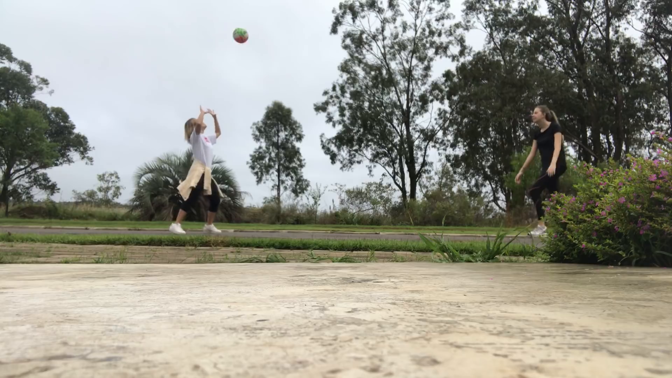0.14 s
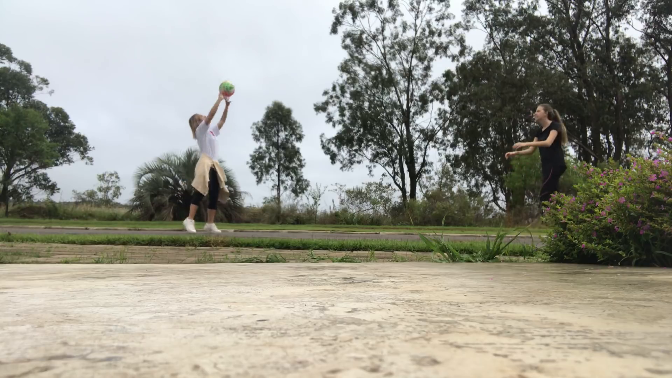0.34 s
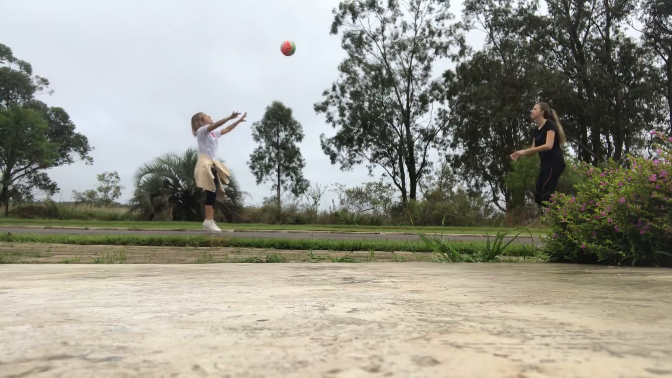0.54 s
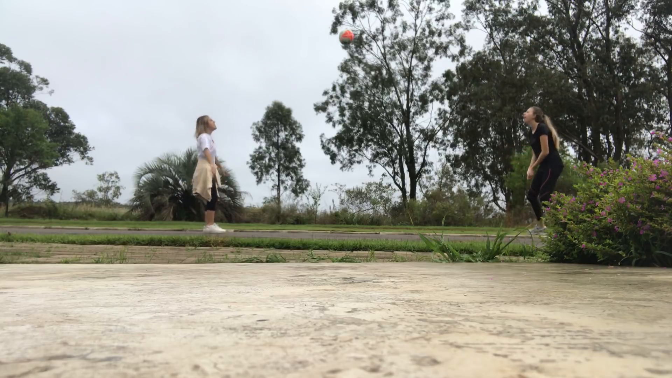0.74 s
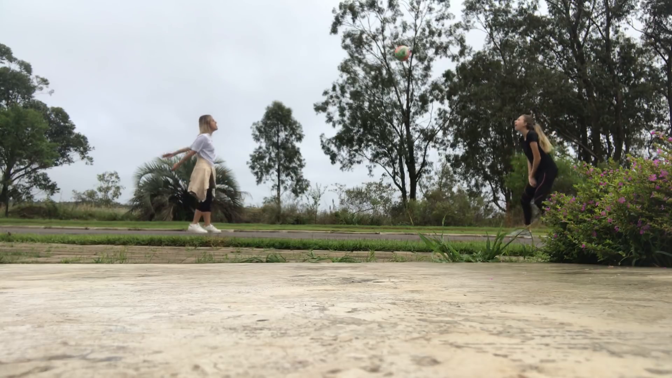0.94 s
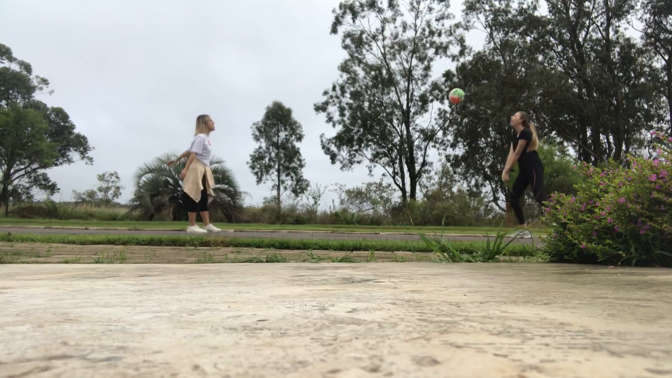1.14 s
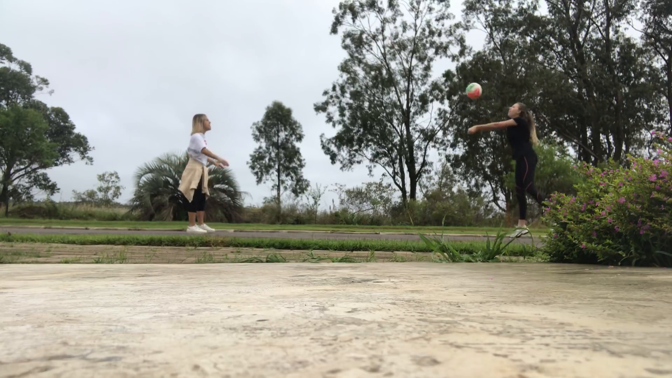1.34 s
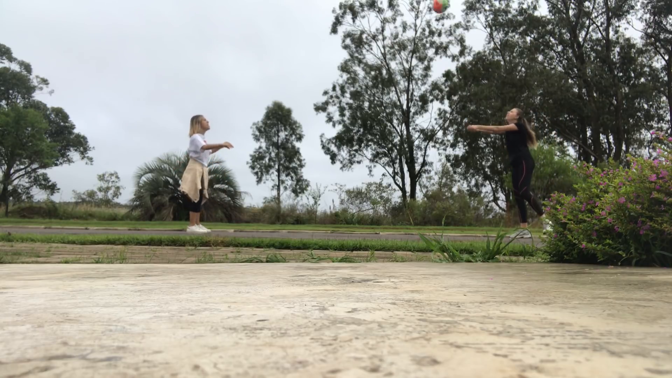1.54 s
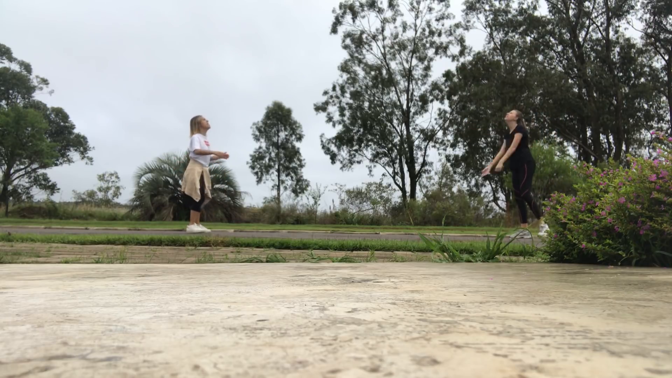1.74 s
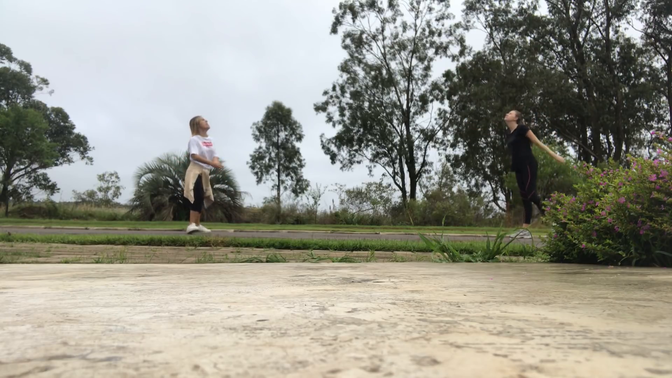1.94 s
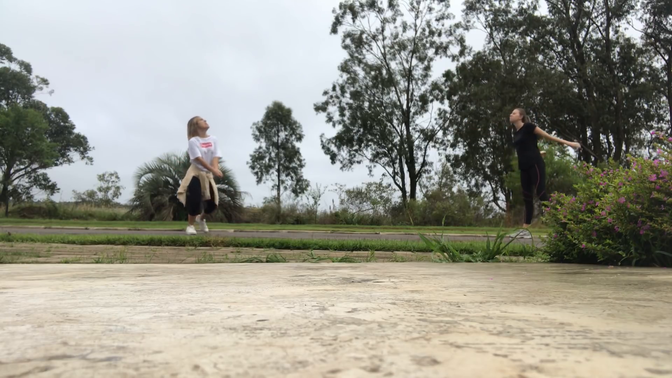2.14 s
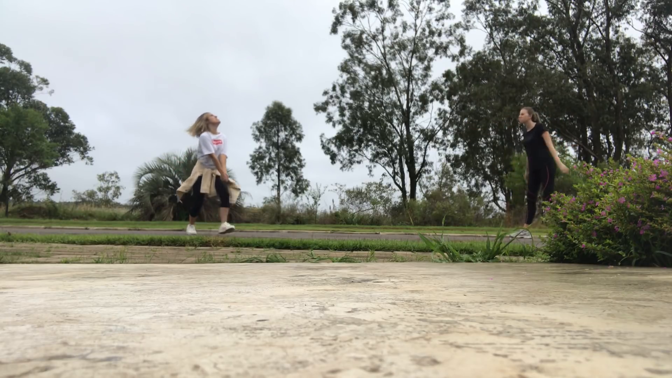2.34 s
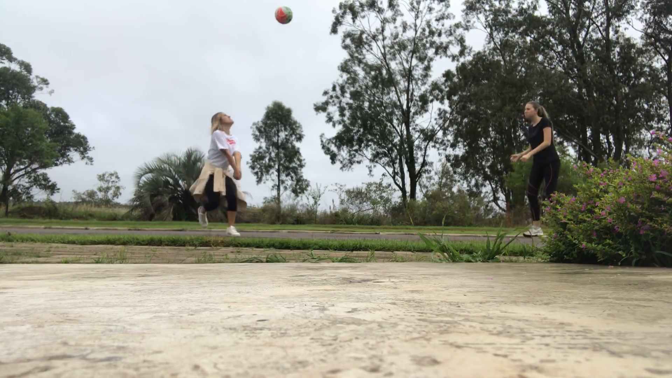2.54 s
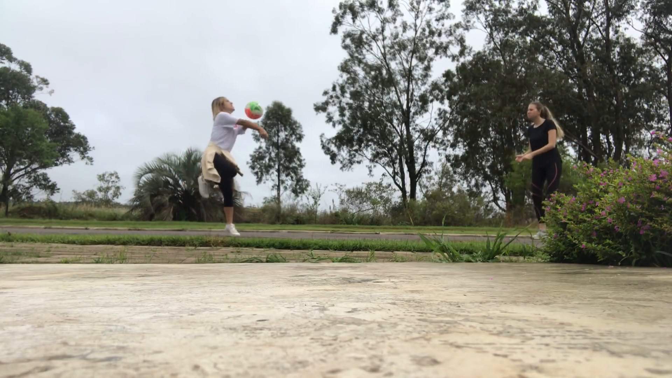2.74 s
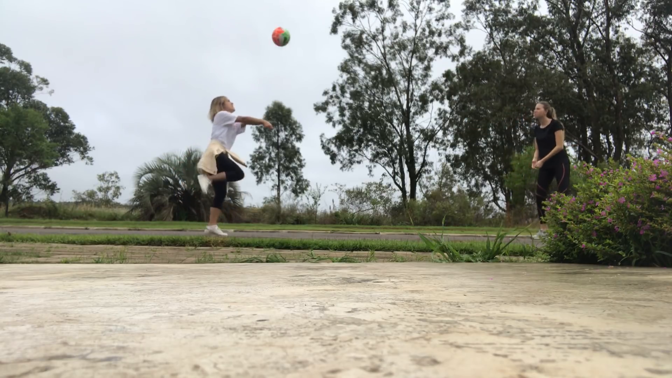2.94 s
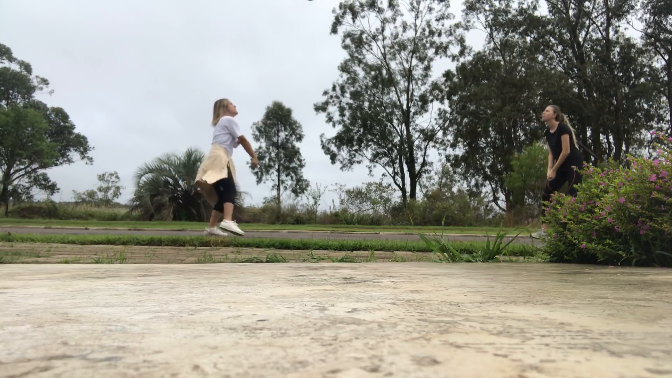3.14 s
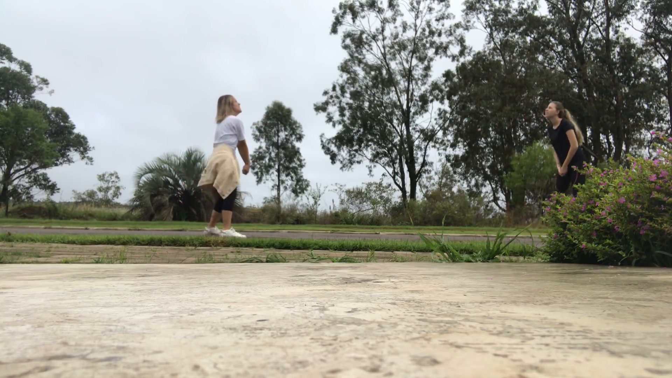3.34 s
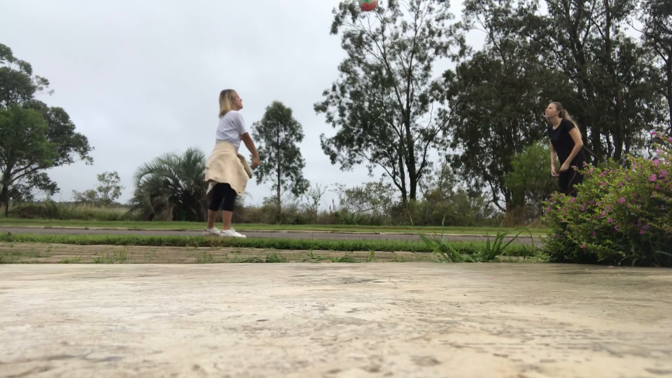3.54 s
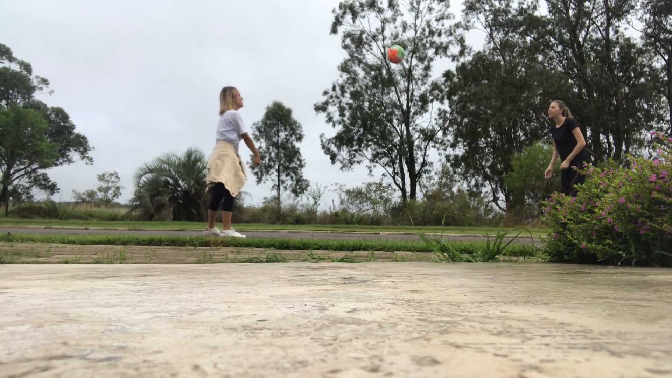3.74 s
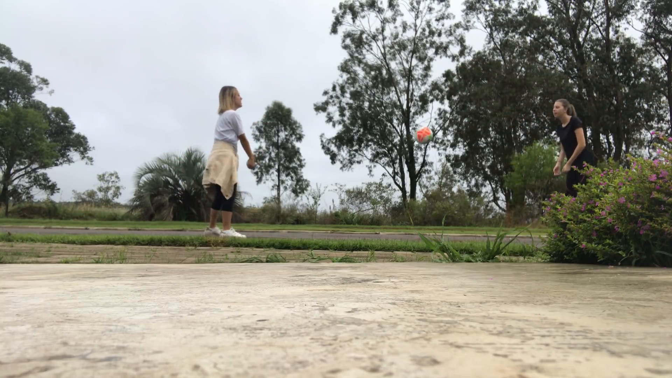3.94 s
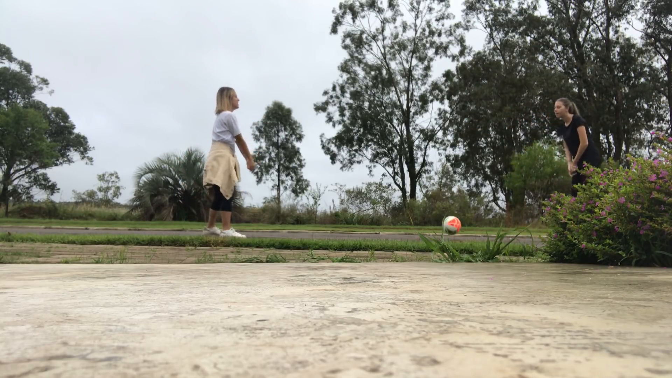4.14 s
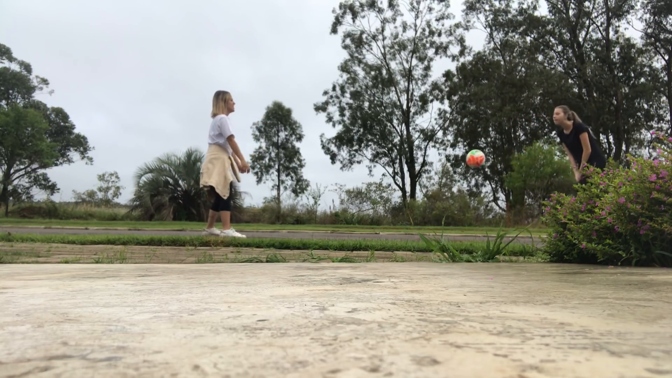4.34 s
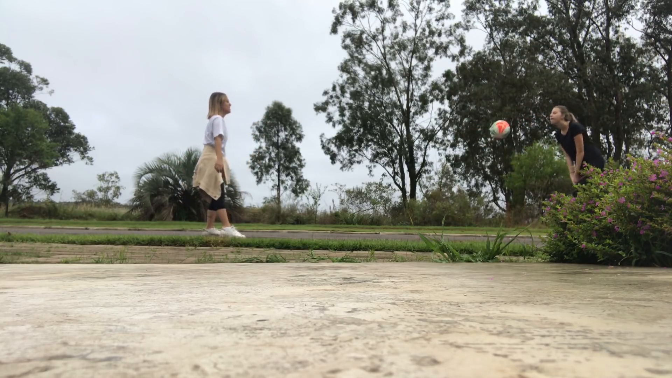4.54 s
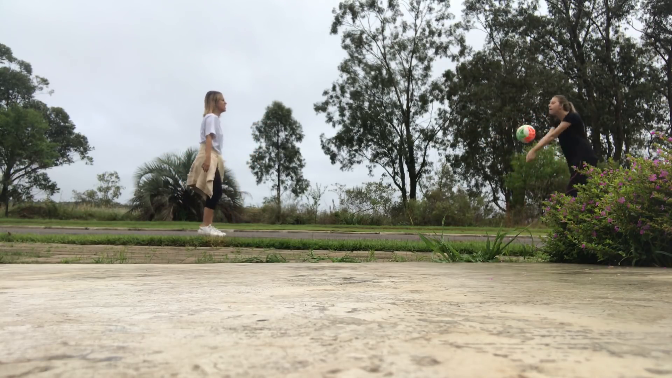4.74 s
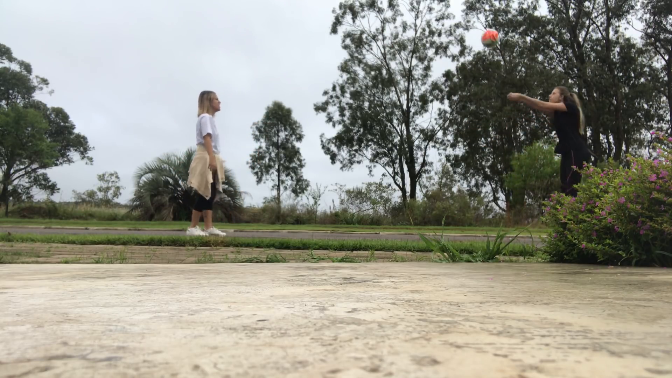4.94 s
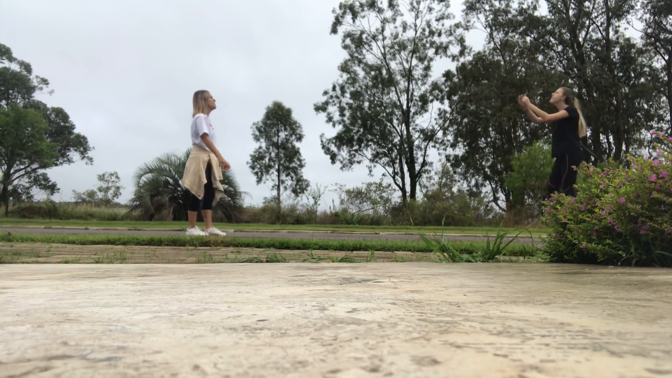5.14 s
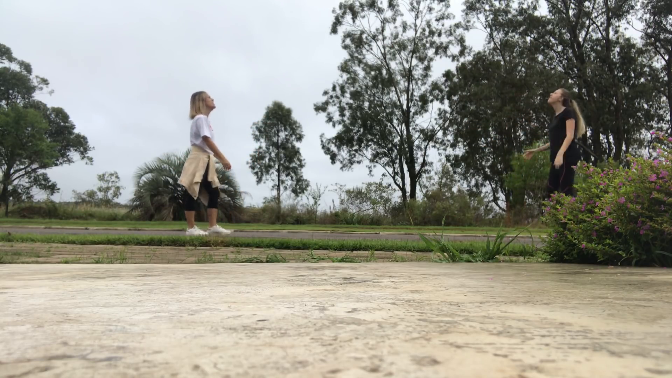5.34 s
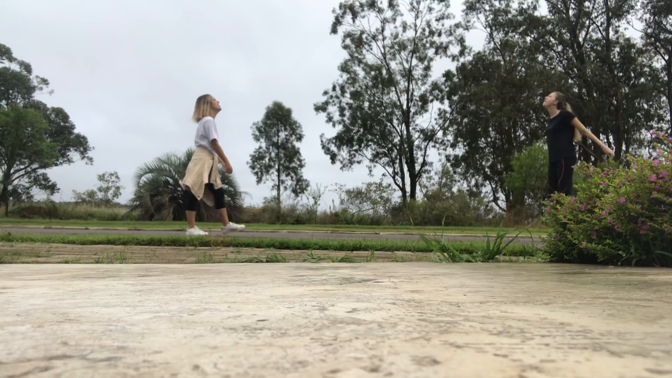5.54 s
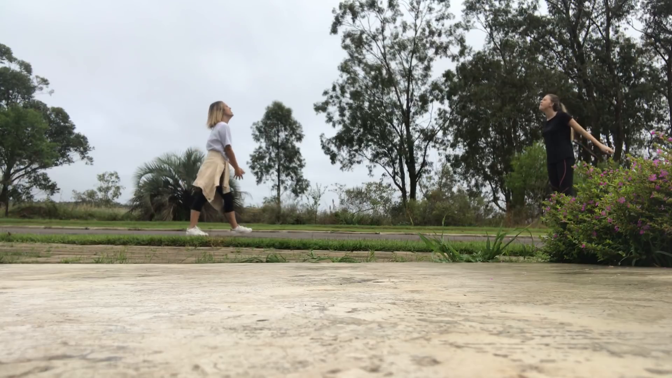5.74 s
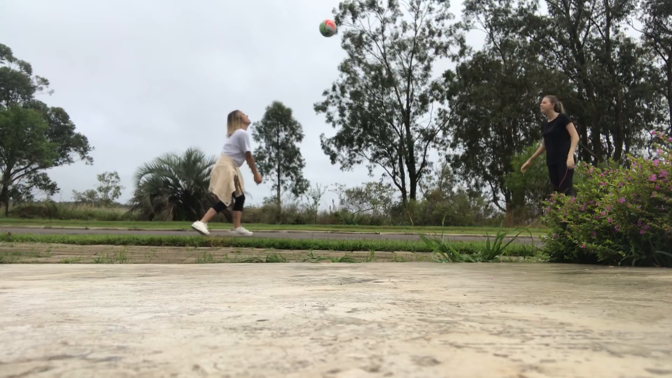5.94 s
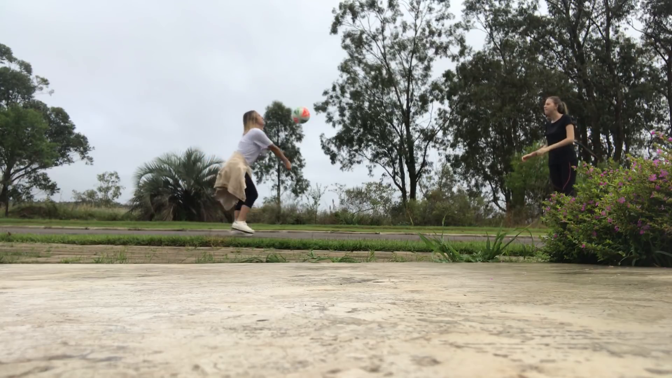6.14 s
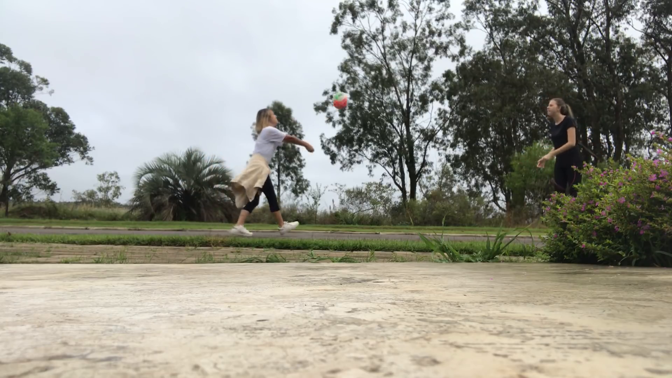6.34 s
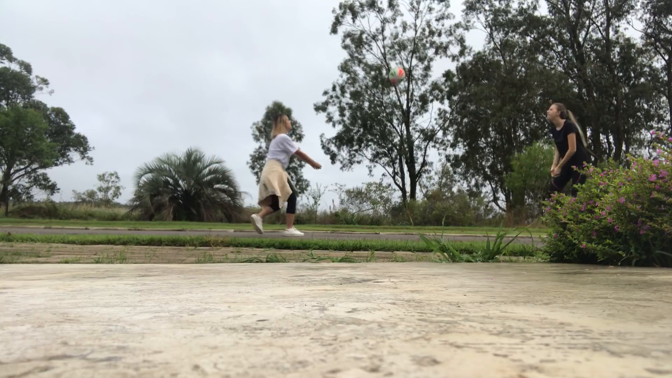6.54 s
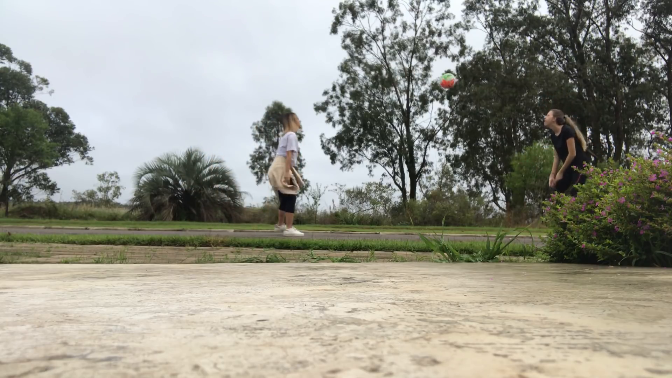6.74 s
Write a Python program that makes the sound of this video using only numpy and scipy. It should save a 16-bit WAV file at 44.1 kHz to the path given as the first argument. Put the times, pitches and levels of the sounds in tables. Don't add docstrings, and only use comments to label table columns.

```python
import sys
import numpy as np
from scipy import signal
from scipy.io import wavfile
from scipy.ndimage import uniform_filter1d

SR = 44100
rng = np.random.default_rng(int(sys.argv[2]) if len(sys.argv) > 2 else 0)


def voltage_ratio(level):
    return 10 ** (np.asarray(level, float) / 20)


def dump_mix(stems):
    frames = np.atleast_2d(stems).T
    limited = np.clip(frames, -1, 1)
    pcm = np.round(limited * 32767).astype(np.int16)
    wavfile.write(sys.argv[1], SR, pcm)


N = 304290

# (frequency [Hz], level [dB per Hz])
RUMBLE = [(18, -59), (30, -0.5), (47, 0), (65, -4), (139, -14), (266, -18), (464, -27), (624, -29),
          (824, -35.5), (973, -34), (2500, -52), (3250, -59), (5500, -120)]
# (frequency [Hz], level [dB per Hz])
HISS = [(700, 6), (1500, 3), (2500, -0.5), (4000, 0.5), (5000, -4.5), (6200, -1), (7600, -4.5),
        (8200, -7.5), (10000, -8), (10500, -14.5), (11200, -8), (14000, -9), (15800, -8.5), (16000, -45)]
# (hold [s], lift [dB], fade [1/s])
LIFTS = [(.2, 16, 11.4), (.41, 16, 0.99), (.22, 13.5, 1.7), (.3, 15.5, 3.2), (.3, 19, 13),
         (0.412, 15, 0.74)]
# (frequency [Hz], share of the lift [0-1])
LIFT_SHARE = [(100, 0.21), (500, 0.12), (2000, 0.65), (16000, 0.72)]
# (frequency [Hz], decay to -60 dB [s])
YARD = [(80, 0.3), (250, 0.35), (1000, 0.14), (4000, 0.16), (12000, 0.15)]

# (start [s], length [s], first pitch [Hz], last pitch [Hz], peak level [dB])
SLIDES = [(3.29, 0.22, 7770, 5080, -63.5), (4.575, 0.18, 7700, 5300, -73)]
CHIRPS = [(.12, 0.14, 7100, 5600, -82), (1.05, 0.045, 4700, 4760, -78), (3.37, 0.025, 6540, 4300, -68),
          (3.37, .06, 7300, 6640, -75), (3.43, .07, 6200, 6930, -75), (3.49, 0.034, 6950, 6750, -76),
          (3.65, .08, 10100, 7900, -80), (4.77, 0.08, 4600, 3900, -77), (6.06, 0.11, 6670, 5160, -74),
          (6.8, 0.069, 6700, 6100, -75), (6.81, .05, 7550, 7000, -79), (6.855, 0.13, 7200, 4610, -65.5)]
# (share of length [0-1], share of fall [0-1], level [dB])
SLIDE_SHAPE = [(0, 0, -14), (.24, .11, -9), (.38, .44, 0), (.6, .66, -4), (.8, .84, -4), (1, 1, -13)]
CHIRP_SHAPE = [(0, 0, -5), (.2, .26, 0), (.6, .66, -2), (1, 1, -6)]

# (time [s], sole level [dB], sole pitch [Hz], grit level [dB])
HEELS = [(0.089, -58, 770, -65.5), (1.004, -60, 930, -63.5), (2.204, -49, 784, -60.5),
         (2.485, -53, 1300, -51.5), (2.534, -43, 660, -77), (2.694, -48, 1300, -54.5),
         (3.059, -52.5, 1070, -66), (3.152, -49.5, 940, -89), (3.255, -51, 684, -57.5),
         (3.675, -57, 720, -71), (3.882, -61, 507, -87), (6.781, -51.5, 611, -64)]
TOES = [(0.827, -53, 660, -82), (1.032, -62, 606, -65), (2.214, -49.5, 675, -75), (2.553, -67, 641, -59.5),
        (2.712, -64, 651, -62), (2.738, -57.5, 1050, -66), (4.088, -58, 514, -61.5), (6.461, -45, 612, -51),
        (6.516, -42, 685, -59), (6.814, -60, 572, -62.5)]
SCUFFS = [(0.104, -56, 920, -62.5), (1.233, -63, 550, -59), (2.505, -49, 674, -58),
          (3.208, -64, 570, -62.5), (3.39, -53, 1120, -52.5), (3.416, -59, 880, -54),
          (3.633, -59, 575, -64.5), (4.108, -57, 940, -63), (4.822, -54, 1690, -60),
          (6.235, -61, 503, -62.5)]
# (rise [s], length [s], thud re sole [dB])
GAITS = [
    (.0003, .008, 8),
    (.0003, .007, -6),
    (.01, .028, -2),
]
# (frequency [Hz], level [dB per Hz])
GRIT = [(1200, -24.5), (2500, 9.5), (4000, 7), (7000, -3), (12000, -14), (15800, -21), (16300, -50)]

# (time [s], side [0 left, 1 right], slap [dB], slap brightness [dB per octave], thump [dB])
BUMPS = [
    (0.3903, 0, -29.5, -1.5, -20),
    (1.3607, 1, -12, -0.5, -15.5),
    (2.8499, 0, -14.5, 1.5, -11.5),
    (4.2148, 1, -9, -0.5, -13),
    (4.8596, 1, -18.5, 0.5, -17),
    (6.295, 0, -8, -1.4, -12.5),
]
# (delay [s], level re slap [dB], top [Hz], clap re slap [dB])
TOUCHES = [
    [(.0042, 8.5, 16200, -6), (.0155, -3, 14000, -3)],
    [(0.0144, -6, 5430, -15)],
    [(0.014, -3, 2470, -11.5)],
    [(.0075, -19, 13900, -10), (.0105, -32, 4000, -12.5)],
    [(0.0123, -4.5, 6500, -18.5)],
    [(0.0127, -25, 7000, -13)],
]
# (frequency [Hz], level [dB per Hz])
SLAP = [(350, -28), (520, -14.5), (700, 1), (1200, -3), (1700, -8), (2500, -8.5), (3500, -6.5),
        (4800, -16.5), (5900, -11), (7900, -22.5), (10300, -23), (13000, -18), (16500, -35.5), (17200, -63)]
# (clap pitch [Hz], clap re slap [dB], wobble pitch [Hz], wobble level [dB], thump pitch [Hz])
CLAPS = [(1136, 7, 317, -28.5, 113), (1587, -9.5, 218, -31, 77), (830, -15, 302, -28, 93),
         (745, -16.5, 320, -22.5, 98), (740, -8.5, 274, -28.5, 84), (1205, -8.5, 235, -33.5, 94)]
# (pitch [Hz], decay to -60 dB [s], twin pitch [Hz], twin re mode [dB], twin decay to -60 dB [s])
CAVITY = [(990, .13, 1050, -4, .1), (1873, .14, 1866, -16, .12), (2490, .16, 2500, -24, .8),
          (3128, .18, 3150, -8, .15), (3258, .25, 3269, -9, .5), (3850, .1, 3990, -2, .1)]
RINGS = [(-54, -44, -44, -49, -50, -53), (-47, -37, -41, -46, -45, -52), (-47, -38, -38, -55, -47, -56),
         (-50, -34, -48, -47, -49, -52), (-62, -39, -39, -70, -68, -62), (-44, -35, -39, -49, -45, -47)]
# (delay [s], level [dB])
WALL = [(.067, -1), (0.141, -12.5), (.213, -18.5)]
# (bass [dB], treble [dB])
WALL_DB = [
    (-30, -26),
    (-14.5, -23),
]


def evened(x):
    return x / np.sqrt(np.mean(x ** 2) + 1e-20)


def read(points, hz):
    f, value = np.transpose(points)
    return np.interp(np.log(hz + 1), np.log(f + 1), value)


def add(mix, s, sound):
    part = mix[round(s * SR):][:len(sound)]
    part += sound[:len(part)]


def colour(x, points):
    hz = abs(np.fft.fftfreq(4096, 1 / SR))
    log_gain = np.log(voltage_ratio(np.maximum(read(points, hz), -100)))
    response = np.exp(log_gain - 1j * signal.hilbert(log_gain).imag)
    taps = np.fft.ifft(response).real[:1024]
    return signal.fftconvolve(x, taps / np.linalg.norm(taps))[:len(x)]


def band(x, lo_hz, hi_hz, order=2):
    return signal.sosfilt(signal.butter(order, [lo_hz, hi_hz], "band", fs=SR, output="sos"), x)


def yard(x):
    taps = np.zeros(SR)
    at = np.arange(1900, SR - 20, 20)
    taps[at + rng.integers(0, 20, len(at))] = rng.choice([-1., 1.], len(at))
    hz, t, z = signal.stft(taps, SR, nperseg=256)
    decay_db = -60 * t / read(YARD, hz)[:, None]
    tail = signal.istft(z * voltage_ratio(decay_db), SR, nperseg=256)[1]
    return signal.fftconvolve(x, tail / np.linalg.norm(tail))[:len(x)]


def air():
    level_db, hiss_db = -51, -42.5
    frames, hz = N // 128 + 9, np.fft.rfftfreq(1024, 1 / SR)
    t = np.arange(frames) * 128 / SR
    real, imag, patches = rng.standard_normal((frames, 513, 3)).T
    patches = evened(uniform_filter1d(uniform_filter1d(patches, 8, 0), 30, 1))
    lift_db = np.zeros(frames)
    for (s, *_), (hold, db, fade) in zip(BUMPS, LIFTS):
        lift_db += db * (t > s) * (t < s + hold) * np.exp(-fade * np.maximum(t - s, 0))
    drift_db = np.where(hz < 500, 1.8, .7)[:, None]
    shape = np.hypot(voltage_ratio(read(RUMBLE, hz)) * (hz < 4000), voltage_ratio(read(HISS, hz) + hiss_db))
    z = (real + 1j * imag) * shape[:, None] * voltage_ratio(drift_db * patches)
    steady = signal.istft(z, nperseg=1024, noverlap=896)[1]
    rumble_rms = np.std(band(steady, 26.7, 440))
    z *= voltage_ratio(level_db + read(LIFT_SHARE, hz)[:, None] * lift_db) / rumble_rms
    return band(signal.istft(z, nperseg=1024, noverlap=896)[1][:N], 46, 17000, order=4)


def birds():
    out = np.zeros(N)
    for rows, shape in ((SLIDES, SLIDE_SHAPE), (CHIRPS, CHIRP_SHAPE)):
        at, fall, swell_db = np.transpose(shape)
        for s, length, first_hz, last_hz, db in rows:
            u = np.arange(0, length, 1 / SR) / length
            waver = evened(uniform_filter1d(rng.standard_normal(N // 8), 200))[:len(u)]
            glide = first_hz + (last_hz - first_hz) * np.interp(u, at, fall)
            pitch = uniform_filter1d(glide, 300) * (1 + 0.005 * waver)
            level = voltage_ratio(db + np.interp(u, at, swell_db) + 3.4 * waver)
            tone = np.sqrt(2) * np.sin(2 * np.pi * np.cumsum(pitch) / SR) * level
            add(out, s, tone * np.minimum(np.arange(len(u)) / 300, 1))
    return out + voltage_ratio(-13) * yard(out)


def shoes():
    out, t = np.zeros(N), np.arange(SR // 6) / SR
    for rows, (rise, length, thud_db) in zip((HEELS, TOES, SCUFFS), GAITS):
        press = (1 - np.exp(-t / rise)) * np.exp(-(t / max(length, .003)) ** 2)
        for s, db, hz, grit_db in rows:
            white, size, low = rng.standard_normal((3, len(t)))
            grains = white * voltage_ratio(3.5 * size)
            sole = voltage_ratio(db - 0.5) * evened(band(white, 0.88 * hz, 1.57 * hz))
            grit = voltage_ratio(grit_db) * evened(colour(grains, GRIT))
            thud = voltage_ratio(db + thud_db - 3.5) * evened(band(low, 147, 455))
            add(out, s, (sole + grit + thud) * press)
    return out + voltage_ratio(-25) * yard(out)


def skin_slap(t, bright_db, clap_hz, clap_db, touches):
    clap_cycles, flesh_s, flesh_db = 1.2, .006, -21.5
    sizzle = .05 * np.exp(-t / .006)
    cracks = rng.standard_normal((3, len(t))) * (.55 * np.exp(-t / .0011) + sizzle)
    cracks[:, 0] -= 4
    skin = [(f, db + bright_db * np.log2(max(f, 1500) / 1500)) for f, db in SLAP]
    turn = t * clap_hz / clap_cycles
    puff = -np.sin(2 * np.pi * clap_hz * t) * turn * np.exp(1 - turn)
    flesh = evened(band(rng.standard_normal(len(t)), 440, 1870))
    flesh *= (t / flesh_s) * np.exp(.5 - (t / flesh_s) ** 2 / 2)
    slap = colour(cracks[0], skin) + voltage_ratio(clap_db) * puff + voltage_ratio(flesh_db) * flesh
    for (delay, db, top_hz, puff_db), crack in zip(touches, cracks[1:]):
        touch = band(colour(crack, skin), 480, top_hz)
        add(slap, delay, voltage_ratio(db) * touch + voltage_ratio(puff_db) * puff)
    return slap


def shell_thump(t, thump_db, hz, wobble_hz, wobble_db, leave_s):
    late = np.maximum(t - .0018, 0)
    turns = hz * late + .55 * (1 - np.exp(-late / .0022))
    thump = voltage_ratio(thump_db) * np.sin(2 * np.pi * turns) * np.exp(-(late / 0.015) ** 2)
    swell = (late / 0.0056) * np.exp(1 - late / 0.0056)
    thump += voltage_ratio(wobble_db) * np.sin(2 * np.pi * wobble_hz * late) * swell
    spring = -np.sin(2 * np.pi * 190 * t) * np.exp(-t / 0.0023)
    add(thump, leave_s, voltage_ratio(thump_db - 0.5) * spring)
    hum = np.sin(2 * np.pi * 105 * t) * (1 - np.exp(-t / 0.021))
    return thump + voltage_ratio(thump_db - 17.5 - 60 * t / 0.29) * hum


def cavity_ring(t, ring):
    modes = np.zeros(len(t))
    for (f, t60, twin_hz, twin_db, twin_t60), db, phase in zip(CAVITY, ring, rng.random(len(CAVITY))):
        modes += voltage_ratio(db - 60 * t / t60) * np.sin(2 * np.pi * (f * t + phase))
        modes += voltage_ratio(db + twin_db - 60 * t / twin_t60) * np.sin(2 * np.pi * (twin_hz * t + phase))
    return modes * (1 - np.exp(-(t / .011) ** 3))


def bump(slap_db, bright_db, thump_db, ring, clap, touches):
    t = np.arange(SR // 2) / SR
    clap_hz, clap_db, wobble_hz, wobble_db, thump_hz = clap
    slap = skin_slap(t, bright_db, clap_hz, clap_db, touches)
    thump = shell_thump(t, thump_db, thump_hz, wobble_hz, wobble_db, touches[-1][0])
    return voltage_ratio(slap_db) * slap + thump + cavity_ring(t, ring)


def ball():
    out, spread = np.zeros(N), np.arange(4000) / 450
    for (s, side, *blow), ring, clap, touches in zip(BUMPS, RINGS, CLAPS, TOUCHES):
        hit = bump(*blow, ring, clap, touches)
        bass_db, treble_db = WALL_DB[round(side)]
        tail = yard(hit)
        add(out, s, hit + voltage_ratio(-31.5) * tail + voltage_ratio(-29) * band(tail, 580, 1240, order=1))
        for delay, db in WALL:
            rough = rng.standard_normal(4000) * spread * np.exp(-spread) / 12
            scattered = signal.fftconvolve(band(hit, 440, 12500, order=1), rough)[:len(hit)]
            add(out, s + delay, voltage_ratio(bass_db + db) * band(hit, 45, 195))
            add(out, s + delay - .006, voltage_ratio(treble_db + 0.7 * db) * scattered)
    return out


def scene():
    return (air() + birds() + shoes() + ball())[None]


def top_cut(x):
    return signal.sosfilt(signal.butter(12, 17110, fs=SR, output="sos"), x)


def record(dry):
    cut = signal.sosfilt(signal.butter(2, 40, "high", fs=SR, output="sos"), dry)
    rounded = .55 * np.tanh(cut / .55)
    top_edge = signal.firwin(511, 16700, window=("kaiser", 10), fs=SR)
    mix = signal.oaconvolve(rounded, top_edge[None], "same")
    return top_cut(mix)


dry = scene()
out = record(dry)
dump_mix(out)
```